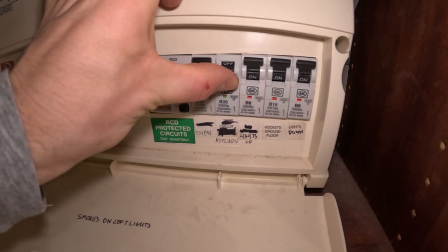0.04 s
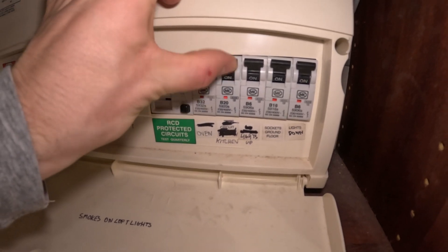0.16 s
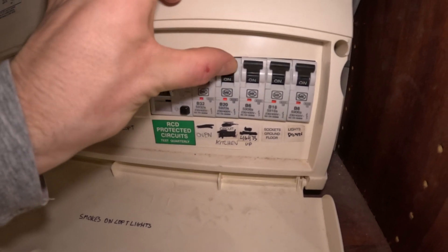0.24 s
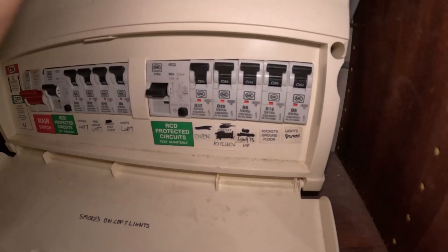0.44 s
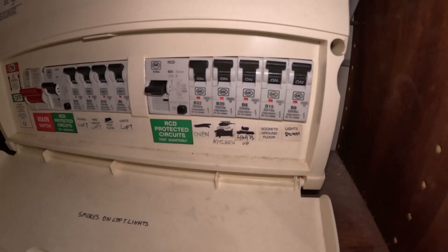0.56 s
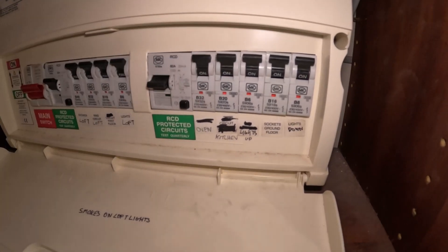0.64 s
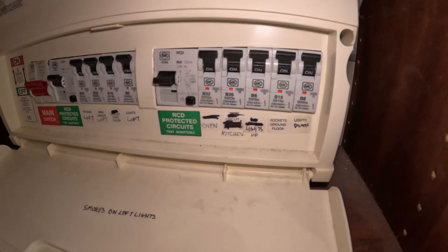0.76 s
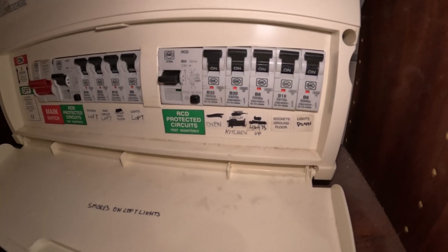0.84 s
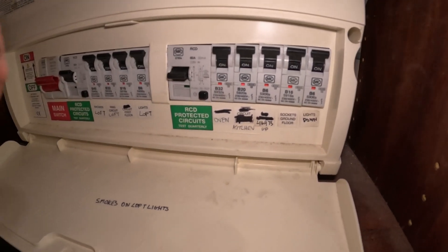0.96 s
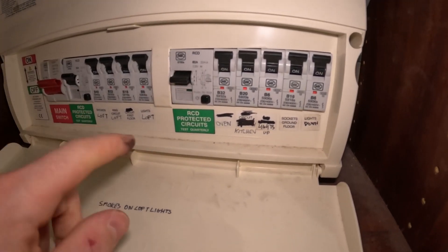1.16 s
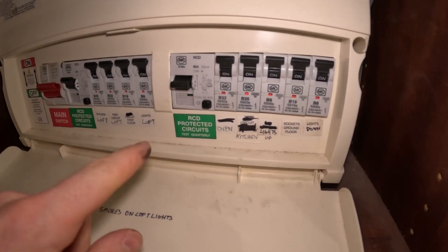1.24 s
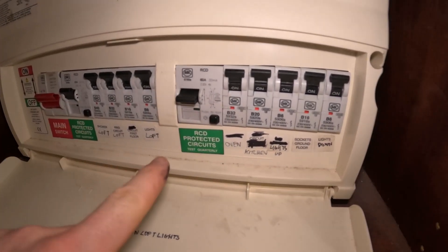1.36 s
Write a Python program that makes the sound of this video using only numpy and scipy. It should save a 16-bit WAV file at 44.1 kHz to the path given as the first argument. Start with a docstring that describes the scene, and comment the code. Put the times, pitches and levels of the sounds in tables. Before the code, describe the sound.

A circuit breaker trips in a plastic fuse box, heard close in a bare room. A faint low groan of the pressed toggle leads to a small metallic spring ping at 0.16 seconds, then clustered clicks from 0.21 build to a loud, sharp snap at 0.26 with a hollow boom. The tail fades over half a second; faint sleeve rustle at 0.7, soft knocks near 0.87, another rustle near 1.4, over quiet room hum.

```python
"""A circuit breaker in a plastic fuse box: a spring pings, the contacts snap shut and the breaker trips at once
with a louder snap that booms in the box. Blows are decaying noise bursts through case and spring resonances,
plus a broad crack and struck box modes. First the box groans (resonant noise) as a thumb pushes the toggle up;
later come soft knocks. A bare room answers with decaying noise; room tone, a low hum and sleeve rustles are
coloured noise. Gain control turns down on the snaps and back up over the tail."""
import sys
import numpy as np
from scipy import signal
from scipy.fft import rfft, irfft, next_fast_len
from scipy.io import wavfile
from scipy.ndimage import uniform_filter1d

SR = 44100
rng = np.random.default_rng(int(sys.argv[2]) if len(sys.argv) > 2 else 0)


def undo_db(level):
    """Turn decibels back into plain size, where 20 dB means ten times bigger."""
    steps = np.asarray(level, float) / 20
    return 10 ** steps


def transcribe(signal):
    """Save signal, clipped to [-1, 1], as a 16-bit WAV file at the path in sys.argv[1]."""
    frames = np.atleast_2d(signal).T
    limited = np.clip(frames, -1, 1)
    pcm = np.round(limited * 32767).astype(np.int16)
    wavfile.write(sys.argv[1], SR, pcm)


N = 61739
T = np.arange(N) / SR
LOW_CUT_HZ = 120


def unit(x):
    """Scales to rms 1."""
    return x / np.sqrt(np.mean(x ** 2) + 1e-20)


def along(points, hz):
    """Interpolates (Hz, value) points on a log frequency axis."""
    point_hz, value = np.transpose(points)
    return np.interp(np.log(hz + 1), np.log(point_hz + 1), value)


def level(points):
    """Gain over time from (s, dB) points."""
    s, db = np.transpose(points)
    return undo_db(np.interp(T, s, db))


def filtered(x, response):
    """Multiplies the spectrum by a response of frequency, zero-padded against wrap-around."""
    size = next_fast_len(N + SR)
    hz = np.fft.rfftfreq(size, 1 / SR)
    return irfft(rfft(x, size) * response(hz), size)[..., :N]


def peaks(table):
    """Causal response of parallel resonances (Hz, width Hz, dB) with alternating sign."""
    def response(hz):
        total = 0
        for k, (centre_hz, width_hz, peak_db) in enumerate(table):
            damping = 1j * hz * width_hz
            total = total + (-1) ** k * undo_db(peak_db) * damping / (centre_hz ** 2 - hz ** 2 + damping)
        return total
    return response


def noise(spectrum, patchy_db):
    """Coloured noise of rms 1 with time-frequency patches of random gain."""
    z = signal.stft(rng.standard_normal(N + 512), nperseg=512)[2]
    field = uniform_filter1d(rng.standard_normal(z.shape), 5, 0)
    field = uniform_filter1d(field, 8, 1)
    patchy = signal.istft(z * undo_db(patchy_db * unit(field)), nperseg=512)[1][:N]
    return unit(filtered(patchy, lambda hz: undo_db(along(spectrum, hz))))


# room tone spectrum: freq_hz, density_db [Hz, dB per Hz]
AIR_SPECTRUM = [(20, -38), (90, -40.5), (130, -20), (230, -17), (440, -5.5), (730, -7.5), (1400, -11.5),
                (2830, -17), (6500, -30), (8500, -50), (12000, -46), (14300, -56.5)]
# room tone level: time_s, level_db [s, dB]
AIR_LEVEL = [(0, -60), (.6, -64.5), (.95, -65.5), (1.03, -63.5), (1.13, -61.5), (1.25, -63), (1.4, -63.5)]


def room_tone():
    """Steady coloured noise with a slow level drift."""
    return level(AIR_LEVEL) * noise(AIR_SPECTRUM, patchy_db=1)


# low hum spectrum: freq_hz, density_db [Hz, dB per Hz]
HUM_SPECTRUM = [(90, -29.5), (150, 2), (200, 5), (330, -8.5), (600, -33.5)]
# low hum level: time_s, level_db [s, dB]
HUM_LEVEL = [(0, -75.5), (.6, -75.5), (.86, -74), (1.0, -72), (1.2, -69.5), (1.28, -72.5), (1.36, -64.5),
             (1.4, -65.5)]


def house_hum():
    """Low hum of the house: low-frequency noise band with a varying level."""
    return level(HUM_LEVEL) * noise(HUM_SPECTRUM, patchy_db=1.5)


# sleeve rustle spectrum: freq_hz, density_db [Hz, dB per Hz]
RUSTLE_SPECTRUM = [(590, -40), (1000, -20), (1060, -27), (1160, -10), (3560, -0.5), (7090, -9.5),
                   (9060, -31.5), (12100, -17), (14300, -50)]
# sleeve rustles: centre_s, half_length_s, level_db [s, s, dB]
RUSTLES = [(0.724, 0.044, -65), (0.872, 0.018, -72), (1.39, .04, -66.5)]


def sleeve_rustle():
    """Cloth friction: coloured noise in Gaussian swells."""
    swell = np.zeros(N)
    for centre_s, half_length_s, level_db in RUSTLES:
        swell += undo_db(level_db) * np.exp(-0.5 * ((T - centre_s) / half_length_s) ** 2)
    return swell * noise(RUSTLE_SPECTRUM, patchy_db=0)


# room decay: freq_hz, t60_s [Hz, s]
ROOM_DECAY = [(100, 0.38), (300, 0.39), (1000, 0.54), (3000, 0.6), (6000, 0.59), (12000, 0.44)]
# room answer spectrum: freq_hz, gain_db [Hz, dB]
ROOM_COLOUR = [(100, 15.5), (300, -2.5), (1000, 0.5), (3000, -8.5), (6000, -10.5), (8000, -5),
               (9200, -12.5), (12000, -7)]


def room(x):
    """Bare room's answer: delayed noise tail in which each frequency dies at its own speed."""
    room_db, delay_s = -16, 0.011
    hz, t, z = signal.stft(rng.standard_normal(SR), SR, nperseg=256)
    t60_s = along(ROOM_DECAY, hz)[:, None]
    tail = signal.istft(z * undo_db(-60 * t / t60_s), SR, nperseg=256)[1]
    delayed = np.pad(x, (round(delay_s * SR), 0))
    wet = signal.fftconvolve(delayed, tail / np.linalg.norm(tail))[:N]
    return undo_db(room_db) * filtered(wet, lambda hz: undo_db(along(ROOM_COLOUR, hz)))


# plastic box modes: freq_hz, level_db, t60_s [Hz, dB, s]
BOX_MODES = [(214, -8, 0.25), (290.8, 12.5, 0.072), (347, 1, 0.19), (453, 7.5, 0.1), (541, 1.5, 0.087),
             (696, -3, 0.097), (801.5, -9.5, 0.18)]


def box_ring(start_s, level_db, rise_s):
    """Struck box: sine modes with a common exponential rise, each decaying at its own rate."""
    t = np.clip(T - start_s, 0, None)
    modes = np.zeros(N)
    for freq_hz, mode_db, t60_s in BOX_MODES:
        modes += undo_db(mode_db - 60 * t / t60_s) * np.sin(2 * np.pi * freq_hz * t)
    return undo_db(level_db) * (1 - np.exp(-t / rise_s)) * modes


# groan level under thumb pressure on the toggle: time_s, level_db [s, dB]
THUMB = [(0.0, -58), (0.014, -51.5), (0.032, -60), (0.07, -54.5), (0.088, -46), (0.158, -67.5), (0.2, -58)]
# groan resonances: freq_hz, width_hz, peak_db [Hz, Hz, dB; response is squared]
GROAN = [(214.5, 85, -3), (375, 37, -3.5), (560, 130, -5.5), (710, 96, -12.5)]
# soft knocks on the box: start_s, level_db [s, dB]
TAPS = [(.856, -62.5), (0.886, -67), (.905, -85)]


def toggle():
    """Thumb pressure drives resonant noise, the groan; later soft knocks ring the box modes."""
    time_s, level_db = np.transpose(THUMB)
    pressure = undo_db(np.interp(T, time_s, level_db, right=-120))
    near = pressure * unit(filtered(rng.standard_normal(N), lambda hz: peaks(GROAN)(hz) ** 2))
    for start_s, tap_db in TAPS:
        near += box_ring(start_s, tap_db, rise_s=0.00099)
    return near + room(near)


# parts striking inside the breaker: start_s, case_db, spring_db, rattle_t60_s, boom_db, spring_damping
# [s, dB, dB, s, dB, times the free width]
BLOWS = [(0.164, -45, -25.5, 0.27, -81, 1.3), (.1690, -54, -11.5, 0.036, -80, 1.1),
         (0.209, -44, -40, .2, -67.5, 2.8), (0.219, -41, -22.5, 0.038, -66, 9),
         (0.223, -42.5, -19, .02, -67, 11), (0.233, -10.5, 7, 0.033, -36.5, 7.6),
         (0.2387, -11, -4.5, .05, -34, 5), (0.257, 4.5, -5.5, 0.018, -29.5, 8),
         (0.2604, 10.5, -2.5, 0.032, -7, 8), (.2680, -1, -15.5, 0.046, -21, 5.4)]
# breaker case resonances: freq_hz, width_hz, peak_db [Hz, Hz, dB]
CASE = [(1620, 370, -8.5), (2240, 130, 1.5), (2570, 340, 8), (3112, 130, 8), (3748, 330, 3.5),
        (4400, 620, 5), (5210, 890, 0.5), (6608, 690, -5.5), (10800, 1200, -17.5), (12100, 1300, -27)]
# spring resonances: freq_hz, free_width_hz, peak_db [Hz, Hz, dB]
SPRING = [(1157, 45, -19), (1814, 32, -6), (2519, 32, -5), (3230, 40, -10), (4188, 24, 4), (5500, 70, -12),
          (7080, 45, -11), (11000, 300, -32)]
# broad crack spectrum: freq_hz, density_db [Hz, dB per Hz]
CRACK = [(290, -43.5), (500, -5), (950, -14.5), (2040, -6.5), (2450, -16), (3190, -10), (8590, -34),
         (11700, -31), (14000, -53)]


def breaker():
    """Each blow: a noise rattle into case and spring, a broad crack and a box boom, with its own echo."""
    crack_db = -7.5  # re case_db
    out = np.zeros(N)
    for start_s, case_db, spring_db, t60_s, boom_db, damping in BLOWS:
        t = np.clip(T - start_s, 0, None)
        shape = undo_db(-60 * t / t60_s) * (1 - np.exp(-t / 0.00046))
        case = peaks(CASE)
        spring = peaks(np.multiply(SPRING, [1, damping, 1]))
        rattle = filtered(shape * rng.standard_normal(N),
                          lambda hz: undo_db(case_db) * case(hz) + undo_db(spring_db) * spring(hz))
        crack = undo_db(case_db + crack_db) * shape * noise(CRACK, patchy_db=-0.5)
        blow = rattle + crack + box_ring(start_s, boom_db, rise_s=0.0065)
        out += blow + room(blow)
    return out


# side over mid: freq_hz, ratio_db [Hz, dB]
APART = [(1000, -87), (5000, -57.5), (8000, -44.5), (11000, -23.5), (14000, 3.5)]


def two_ports(mid):
    """Two close ports: they differ through a smeared side signal and a lean, both strongest in high treble."""
    lean_db = -10  # re APART; lean favours the right port
    smear = rng.standard_normal(400) * undo_db(-np.arange(400) / 12)
    smeared = np.convolve(mid, smear / np.linalg.norm(smear))[:N]
    side = filtered(smeared, lambda hz: undo_db(along(APART, hz)))
    lean = filtered(mid, lambda hz: undo_db(along(APART, hz) + lean_db))
    return np.array([mid + side - lean, mid - side + lean])


def low_cut(hz):
    """Sixth-order high-pass: three equal resonant second-order stages."""
    stage = -hz ** 2 / (LOW_CUT_HZ ** 2 - hz ** 2 + 1j * hz * LOW_CUT_HZ)
    return stage ** 3


def scene():
    """Breaker and toggle with the bass cut, plus the background, at two ports."""
    background = room_tone() + house_hum() + sleeve_rustle()
    mid = filtered(toggle() + breaker(), low_cut) + background
    return two_ports(mid)


def top_cut(x):
    """Nothing passes above the cut-off."""
    return signal.sosfilt(signal.butter(12, 14450, fs=SR, output="sos"), x)


def record(dry):
    """Gain control ducks on peaks and climbs back at a steady rate; soft clip and band limit follow."""
    limit_db, squeeze = -11.5, 0.5  # squeeze: dB of duck per dB over the limit
    recover_db_per_s, smooth_s, top_hz = 69, 0.006, 13650
    peak_db = 20 * np.log10(np.abs(dry).max(0) + 1e-9)
    over_db = squeeze * np.clip(peak_db - limit_db, 0, None)
    climb_db = recover_db_per_s * T
    duck_db = np.maximum.accumulate(over_db + climb_db) - climb_db
    smooth = max(round(smooth_s * SR), 1)
    gain = undo_db(-uniform_filter1d(duck_db, smooth, origin=(smooth - 1) // 2))
    clipped = np.tanh(dry * gain)
    mix = filtered(clipped, lambda hz: 1j * hz / (LOW_CUT_HZ + 1j * hz) / (1 + (hz / top_hz) ** 60))
    return top_cut(mix)


dry = scene()
out = record(dry)
transcribe(out)
```